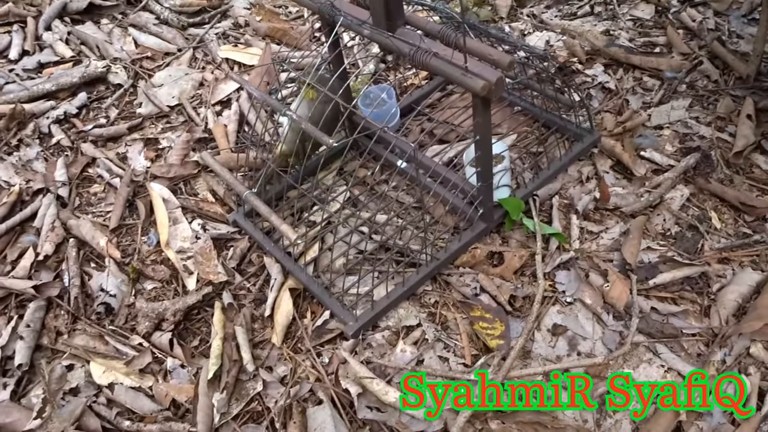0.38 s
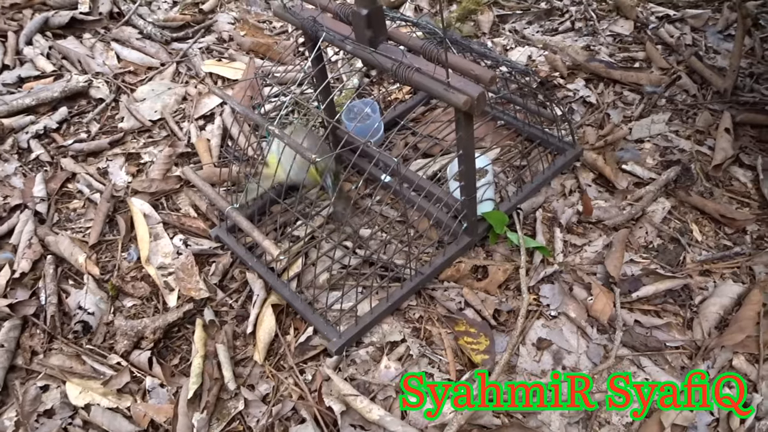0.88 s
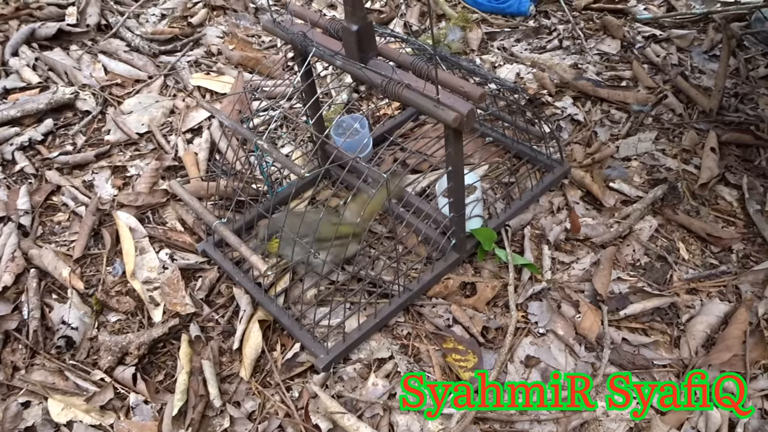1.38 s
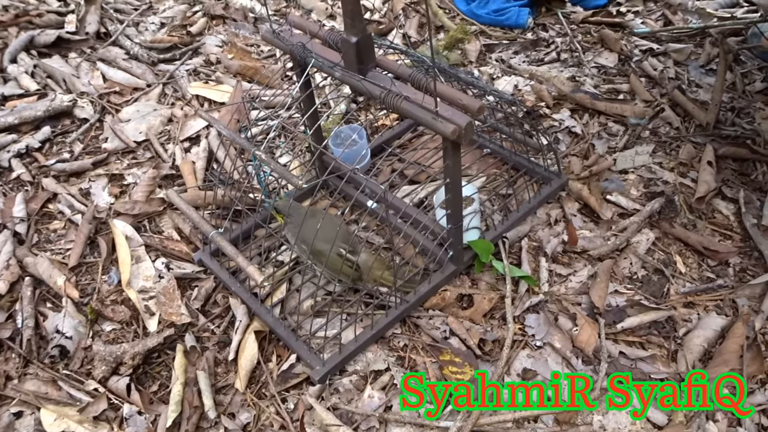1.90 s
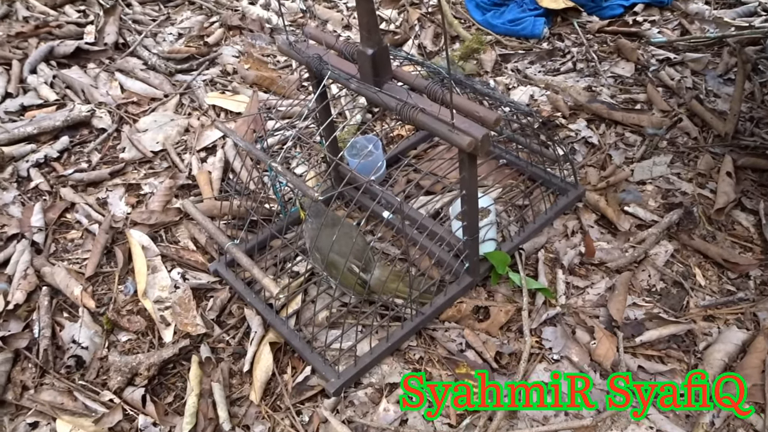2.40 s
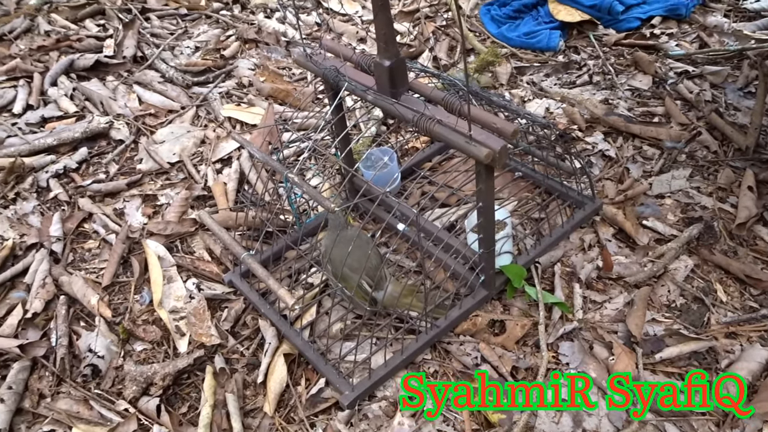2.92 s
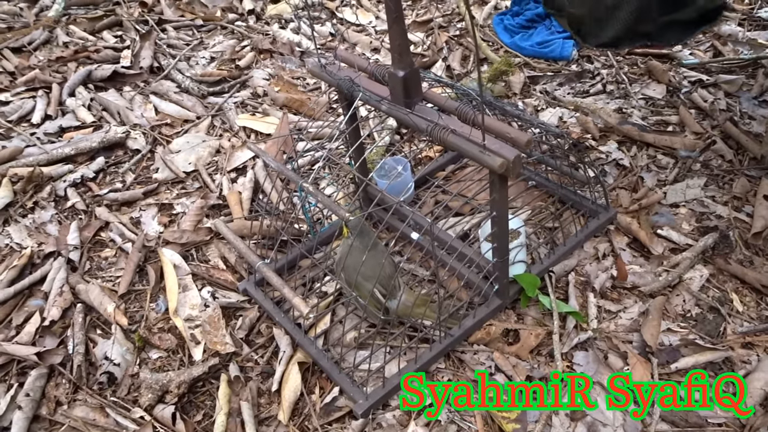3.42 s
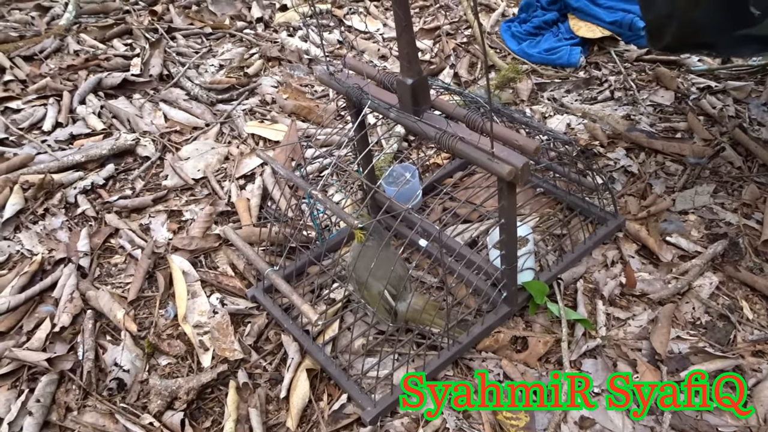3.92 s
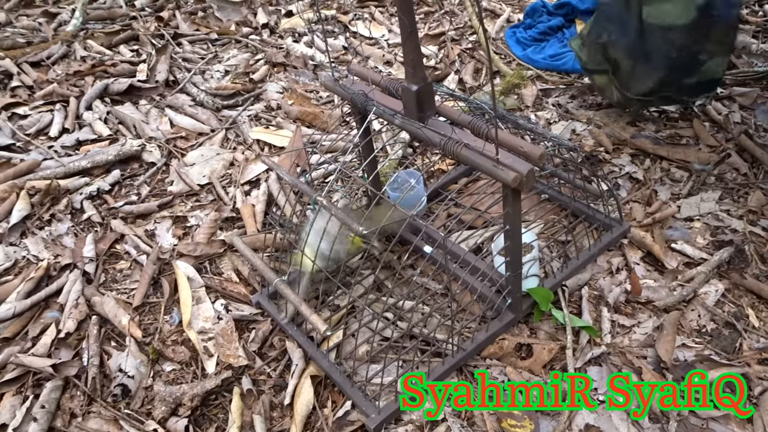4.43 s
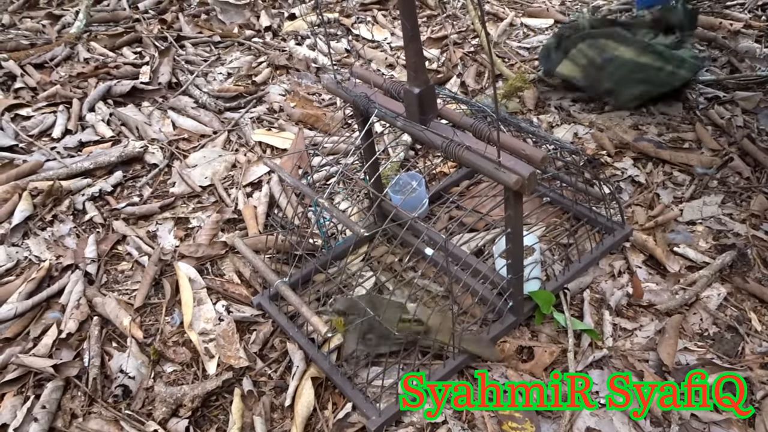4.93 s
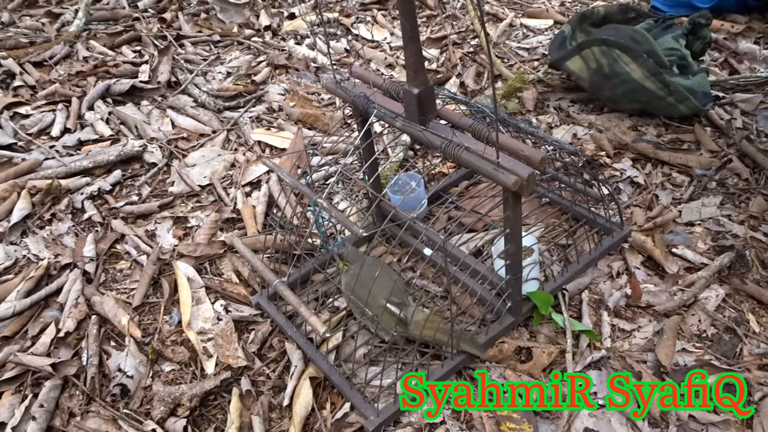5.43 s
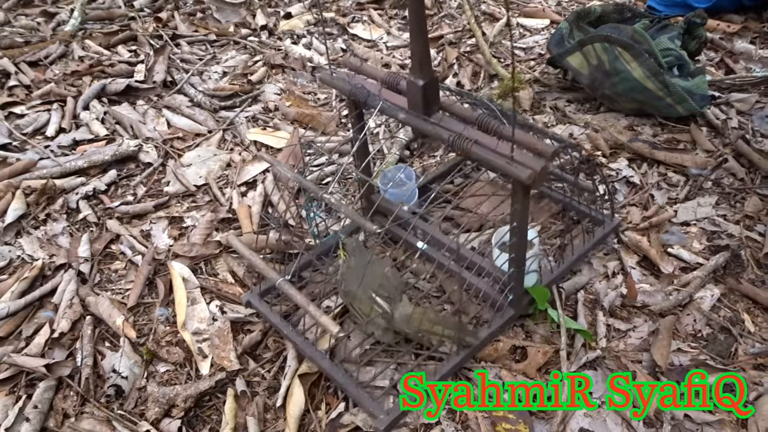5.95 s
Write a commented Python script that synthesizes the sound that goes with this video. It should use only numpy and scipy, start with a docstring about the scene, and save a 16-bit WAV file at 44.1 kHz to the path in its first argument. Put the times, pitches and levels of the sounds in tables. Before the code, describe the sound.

Harsh rattling bird chatter bursts close on the left, a farther bird whistles and chatters, while a caged bird flutters and ticks against wires outdoors.

```python
"""A forest floor: low rumble, airy hiss and an insect chorus, all shaped noise, lie under thin tones for crickets.
A caged bird flutters: grainy noise for its wings, ringing clicks for the wires, short thuds for the frame.
A farther bird answers with chatter, and whistles and buzzes in gliding tones; a near bird on the left rattles
harsh chatter: pulses whose rate sweeps upward, coloured by the throat. Echoes surround both birds."""
import sys
import numpy as np
from scipy import signal
from scipy.fft import rfft, irfft, next_fast_len
from scipy.io import wavfile
from scipy.ndimage import uniform_filter1d, map_coordinates

SR = 44100
rng = np.random.default_rng(int(sys.argv[2]) if len(sys.argv) > 2 else 0)


def volts(x):
    """Linear amplitude factor 10**(x/20) for a level x in dB, scalar or array-like."""
    e = np.asarray(x, float) / 20
    return 10 ** e


def generate_wav(signal):
    """Clip the signal to [-1, 1] and save it as 16-bit WAV at the path in sys.argv[1]."""
    frames = np.transpose(np.atleast_2d(signal))
    scaled = np.clip(frames, -1, 1) * 32767
    pcm = np.round(scaled).astype(np.int16)
    wavfile.write(sys.argv[1], SR, pcm)


N = 267687
TOP_HZ = 11050  # chatter has no overtones above this, and the whole mix is dimmed there


def unit(x):
    """Scales a sound to rms 1."""
    return x / np.sqrt(np.mean(x ** 2) + 1e-20)


def along(points, hz):
    """Reads a value between (frequency [Hz], value) points on a log frequency axis."""
    f, v = np.transpose(points)
    return np.interp(np.log(hz + 1), np.log(f + 1), v)


def curves(rows):
    """Draws lines between timed rows: one value per sample for each column after the time."""
    s, *columns = np.transpose(rows)
    return [np.interp(np.arange(N) / SR, s, column) for column in columns]


def wobble(rate, size=N):
    """A smooth random curve with rate random knots a second."""
    knots = rng.standard_normal(int(size * rate / SR) + 4)
    return map_coordinates(knots, [np.arange(size) * rate / SR])


def filtered(x, response):
    """Multiplies the spectrum of x by a response of frequency."""
    m = next_fast_len(x.shape[-1] + 8192)
    spectrum = rfft(x, m) * response(np.fft.rfftfreq(m, 1 / SR))
    return irfft(spectrum, m)[..., :x.shape[-1]]


def resonances(modes):
    """Response of ringing (frequency [Hz], width [Hz], level [dB]) modes, added with alternating sign."""
    def response(f):
        return sum((-1) ** k * volts(db) * 1j * f * width / (hz * hz - f * f + 1j * f * width)
                   for k, (hz, width, db) in enumerate(modes))
    return response


def add(track, s, sound):
    """Mixes a sound into a track from time s."""
    part = track[..., round(s * SR):][..., :sound.shape[-1]]
    part += sound[..., :part.shape[-1]]


# How alike left and right are in the noises: (frequency [Hz], likeness [0 to 1])
LIKENESS = [(60, 0.97), (170, 1), (490, 0.71), (1390, 0.52), (3960, 0.2), (11300, 1)]


def rush(gain, patchy_db):
    """Stereo noise of rms 1: a gain over frequency colours it and random patches swell and fade."""
    z = signal.stft(rng.standard_normal((2, N)), nperseg=512)[2]
    patches = uniform_filter1d(uniform_filter1d(rng.standard_normal(z.shape[1:]), 6, 0), 10, 1)
    pair = signal.istft(z * volts(patchy_db * unit(patches)), nperseg=512)[1][:, :N]

    def middle_and_side(hz):
        turn = np.arccos(np.clip(along(LIKENESS, hz), -1, 1)) / 2
        return gain(hz) * [np.cos(turn), np.sin(turn)]

    mid, side = filtered(pair, middle_and_side)
    return unit(np.array([mid + side, mid - side]))


# How fast echoes of each pitch die, before life stretches it: (frequency [Hz], time to fall 60 dB [s])
ECHO_TIMES = [(1000, 0.19), (4000, 0.23), (10000, 0.36)]


def echoes(x, life):
    """Trunks scatter the sound back: a decaying noise tail, each frequency dying at its own speed."""
    hz, t, z = signal.stft(rng.standard_normal((2, SR // 2)), SR, nperseg=256)
    decay = volts(-60 * t / (life * along(ECHO_TIMES, hz)[:, None]))
    tail = signal.istft(z * decay, SR, nperseg=256)[1]
    late = np.pad(x, (200, 0))  # echoes start 200 samples after the sound
    return signal.fftconvolve(late[None], tail / np.linalg.norm(tail[0]), axes=1)[:, :N]


def placed(x, side, lag_s):
    """Places a sound in stereo: left and right differ in level, and the left hears it lag_s earlier."""
    def response(f):
        level = volts(np.outer([.5, -.5], along(side, f)))
        return level * np.exp(np.outer([1j, -1j], np.pi * f * lag_s))
    return filtered(x, response)


# Strength of the rumble over time: (time [s], level [dB])
RUMBLE_LEVEL = [(0.0, -54.5), (0.98, -61.5), (1.55, -57.5), (1.76, -55.5), (2.64, -62.5), (3.11, -62),
                (4.06, -62), (4.38, -57.5), (4.62, -55), (4.95, -64), (5.29, -63), (6.07, -69.5)]
# Colour of the rumble: (frequency [Hz], relative level [dB per Hz])
RUMBLE_COLOUR = [(12, -60), (20, -9.5), (65, -1.5), (108, 1), (203, -1.5), (308, -10.5), (500, -27),
                 (650, -26), (1100, -120)]


def rumble():
    """Low rumble: deep noise whose strength wavers slowly."""
    level = volts(curves(RUMBLE_LEVEL)[0] + 1.5 * wobble(9))
    return level * rush(lambda f: volts(along(RUMBLE_COLOUR, f)), patchy_db=2.5)


# Strength of the two hisses: (time [s], insect level [dB], air level before a fixed boost [dB])
HISS_LEVELS = [(0.0, -50.5, -63.5), (0.93, -52.5, -61), (1.5, -51.5, -63), (1.72, -48.5, -68),
               (2.11, -50, -64), (3.25, -56, -66), (4.02, -56.5, -57.5), (4.36, -49.5, -59),
               (5.6, -54, -57.5), (6.07, -44.5, -61)]
# Colour of the air: (frequency [Hz], relative level [dB per Hz])
AIR_COLOUR = [(200, -9), (400, -6), (1100, -5), (2500, -7.5), (4000, -11), (5600, -12.5), (8500, -15),
              (11200, -21)]


def air():
    """Broad airy noise, softer toward the treble."""
    level = volts(curves(HISS_LEVELS)[1] + 4.0)
    return level * rush(lambda f: volts(along(AIR_COLOUR, f)), patchy_db=3.0)


# Bands of the far insect chorus: (centre [Hz], width [Hz], relative level [dB])
INSECT_BANDS = [(3120, 157, 4), (4780, 186, -10), (6380, 28, 0), (7330, 540, -6), (9160, 265, -12.5)]


def insects():
    """Far insect chorus: noise gathered into bands, too dense to hear single insects."""
    def bands(f):
        return np.sqrt(sum(volts(2 * db) * np.exp(-((f - hz) / width) ** 2) for hz, width, db in INSECT_BANDS))
    level = volts(curves(HISS_LEVELS)[0] + .5 * wobble(6))
    return level * rush(bands, patchy_db=.5)


def tones(rows, blur_hz, waver_db):
    """Long faint sine tones that swell in, drift in pitch, waver and fade."""
    track = np.zeros((2, N))
    for start, end, first_hz, last_hz, db in rows:
        size = int((end - start) * SR)
        u = np.arange(size) / size
        hz = first_hz + (last_hz - first_hz) * u + blur_hz * wobble(28.74, size=size)
        fade = np.clip(6 * np.minimum(u, 1 - u), 0, 1)
        level = volts(db + waver_db * wobble(11.6, size=size)) * fade
        phase = 2 * np.pi * np.cumsum(hz) / SR + rng.normal(0, 0.66, (2, 1))  # left and right differ
        add(track, start, np.sqrt(2) * level * np.sin(phase))
    return track


# Faint low tones: (start [s], end [s], first pitch [Hz], last pitch [Hz], level [dB])
HUM_TONES = [(3.66, 4.2, 704, 705, -61), (4.62, 5.0, 705, 706, -59), (4.66, 5.0, 1410, 1412, -59),
             (5.0, 5.5, 1412, 1414, -64)]


def hum():
    """Faint low tones with a nearly steady pitch."""
    return tones(HUM_TONES, blur_hz=4.4, waver_db=2.5)


# Cricket trills, most of them rising: (start [s], end [s], first pitch [Hz], last pitch [Hz], level [dB])
CRICKET_TRILLS = [(0, .6, 3070, 3085, -57), (.4, 1.4, 3225, 3225, -59), (.6, 1.5, 2990, 3010, -59),
                  (2.2, 3.65, 2980, 3018, -56.5), (2.2, 3.35, 3072, 3110, -58), (2.9, 4.9, 3155, 3232, -59),
                  (4.6, 6.07, 3075, 3100, -58), (5.2, 6.07, 3000, 3015, -64), (0, 3, 9250, 9300, -72),
                  (3.5, 4.2, 9200, 9250, -74)]


def crickets():
    """Crickets as thin high tones that waver in strength and pitch."""
    return tones(CRICKET_TRILLS, blur_hz=4.9, waver_db=4.5)


# Bouts of rustling wings and litter: (start [s], end [s], level [dB])
RUSTLE_BOUTS = [(0.306, 0.313, -41.5), (0.421, 0.439, -45), (1.453, 1.485, -51.5), (1.493, 2.024, -51),
                (4.147, 4.145, -34.5), (4.2, 4.208, -39.5), (4.269, 4.283, -38), (4.31, 4.453, -45.5),
                (4.484, 4.5, -33), (4.562, 4.593, -46), (4.631, 4.634, -43), (4.68, 4.707, -46),
                (4.896, 4.95, -48.5), (4.99, 5.294, -46), (5.82, 5.835, -51), (6.009, 6.073, -46.5)]


def flutter():
    """Strength of the rustle: each bout rises, holds and dies away."""
    t = np.arange(N) / SR
    rise_db_per_s, fall_db_per_s = 491, 248
    level = np.zeros(N)
    for start, end, db in RUSTLE_BOUTS:
        before, after = np.maximum(start - t, 0), np.maximum(t - end, 0)
        level += volts(db - rise_db_per_s * before - fall_db_per_s * after)
    return level


# Colour of the rustling wings: (frequency [Hz], relative level [dB per Hz])
WING_COLOUR = [(59, -48), (100, -3), (226, -21.5), (700, -2.5), (837, -10), (1580, 2.5), (2000, -1.5),
               (3160, -2), (9620, -6), (11500, -5), (15000, -60), (22000, -120)]


def rustle(level):
    """Rustling wings: noise broken into grains by two fast random swells."""
    grains = volts(4.0 * wobble(60) + 2.25 * wobble(400))
    noise = rush(lambda f: volts(along(WING_COLOUR, f)), patchy_db=2.5)
    return level * unit(grains * noise)


# Ringing of the cage wires: (frequency [Hz], width [Hz], relative level [dB])
WIRE_RINGING = [(2000, 1300, -10.5), (3830, 660, 4), (6530, 850, 5), (9820, 2000, 0)]


def patter(level):
    """Small random ticks ring the wires, rising and falling with the rustle, their peaks above it."""
    hits_per_s, over_rustle_db, spread_db = 54, 11, 0.5
    hits = (rng.random(N) < hits_per_s / SR) * volts(spread_db * rng.standard_normal((2, N))) * level
    t = np.arange(SR // 100) / SR
    snap = filtered(rng.standard_normal(len(t)) * volts(-60 * t / 0.0099), resonances(WIRE_RINGING))
    return volts(over_rustle_db) * signal.fftconvolve(hits, snap[None] / abs(snap).max(), axes=1)[:, :N]


# Single short ticks, some very faint; peak and body get a small fixed boost:
# (time [s], peak level [dB], body level below 4500 Hz [dB], left over right [dB])
SHORT_TICKS = [(0.105, -37.5, -23, 11), (0.375, -30, -12, 3), (1.4337, -26, -16, -4), (1.4633, -27, -3, 6),
               (3.302, -43.5, 7, -13), (3.7133, -39.5, 11, -9), (3.892, -49, -18, -16),
               (4.14, -27.5, -13, -22), (4.4858, -22, 24, 9), (4.65, -30, 11, -2), (4.8365, -29, -10, 0),
               (4.927, -31, -8, -11), (4.8648, -13, -8, 5.5), (4.916, -23.5, -8, -2), (4.938, -23, -13, 5),
               (5.075, -28, 13, 19), (5.1068, -24.5, 9, 13), (5.255, -35, -10, -16), (5.284, -37, -13, -23),
               (5.378, -44, -17, -33), (5.848, -24, 11, 3), (6.0463, -9, -0.5, 6.5)]


def short_ticks():
    """Single short ticks: a very short burst of noise through the ringing of the wires."""
    track = np.zeros((2, N))
    t = np.arange(SR // 10) / SR
    for s, db, body_db, pan_db in SHORT_TICKS:
        burst = rng.standard_normal(len(t)) * volts(-60 * t / .006)
        snap = filtered(burst, lambda f: resonances(WIRE_RINGING)(f) * volts((body_db + 2.5) * (f < 4500)))
        sides = volts(np.array([[pan_db], [-pan_db]]) / 2)
        add(track, s - .0005, volts(db + 0.5) * snap / abs(snap).max() * sides)
    return track


# Bumps on the frame: (time [s], level before a fixed cut [dB], pitch of the thud [Hz])
FRAME_BUMPS = [(0.144, -46.5, 387), (4.119, -35.5, 150), (4.157, -33, 156), (4.261, -33.5, 171),
               (4.476, -34.5, 195), (4.519, -37.5, 259), (4.626, -38.5, 330), (4.687, -45, 330),
               (5.458, -26, 131)]


def frame_bumps():
    """The wooden frame bumps: a short low tone with a noisy knock, stronger in higher bumps."""
    track = np.zeros((2, N))
    t = np.arange(SR // 10) / SR
    for s, db, hz in FRAME_BUMPS:
        knock = unit(filtered(rng.standard_normal(len(t)), resonances([(330, 78, -8), (1220, 2100, -22)])))
        thud = np.sin(2 * np.pi * hz * t + 0.86 * wobble(143, size=len(t)))
        shape = volts(db - 3.5 - 60 * t / 0.12) * (1 - np.exp(-t / 0.0051))
        add(track, s, shape * ((hz / 300) ** 2 * knock + thud))
    return track


def cage():
    """The caged bird: wings rustle in grainy gusts, short ticks ring, the frame bumps."""
    level = flutter()
    return patter(level) + rustle(level) + short_ticks() + frame_bumps()


def voice(rows, db, overtones_db, carry):
    """One gliding note (fundamental first in overtones_db): it swells in, carries by its pitch and fades."""
    soft_db, swell_s, fade_s = 6.5, 0.0079, .0018  # starts soft_db softer
    s, hz = np.transpose(rows)
    t = np.arange(s[0], s[-1], 1 / SR)
    pitch = uniform_filter1d(np.interp(t, s, hz), 90)
    phase = 2 * np.pi * np.cumsum(pitch * (1 + 0.017 * wobble(248.8, size=len(t)))) / SR
    fade = np.clip(np.minimum(t - s[0], s[-1] - t) / fade_s, 0, 1)
    tone = sum(volts(o) * np.sin((k + 1) * phase) for k, o in enumerate(overtones_db))
    swell_db = -soft_db * np.exp(-(t - s[0]) / swell_s)
    level_db = db + along(carry, pitch) + swell_db + 1.73 * wobble(187, size=len(t))
    return np.sqrt(2) * volts(level_db) * fade * tone


# Whistled notes, one list of points for each: (time [s], pitch [Hz])
WHISTLES = [
    [(0.467, 1710), (0.475, 3380), (0.482, 3800), (0.495, 4420)],
    [(0.6, 2000), (0.614, 2185), (0.622, 3190), (0.629, 4050), (0.64, 3870)],
    [(1.805, 1565), (1.815, 2220), (1.827, 4030), (1.839, 3794)],
    [(1.93, 2160), (1.945, 2060), (1.96, 3200)],
    [(2.102, 1620), (2.112, 2170), (2.127, 3880), (2.144, 3790), (2.157, 3770)],
    [(2.158, 3500), (2.166, 2584), (2.182, 3790), (2.2, 3710), (2.222, 2740)],
    [(2.297, 2100), (2.305, 3120)],
    [(2.305, 4110), (2.315, 4170), (2.331, 3130), (2.345, 2990)],
    [(2.396, 1910), (2.405, 3150), (2.42, 2810), (2.438, 2830), (2.456, 3550), (2.472, 3360)],
    [(2.607, 2080), (2.619, 2070), (2.624, 2440), (2.632, 2620)],
    [(2.7, 2180), (2.722, 1947), (2.742, 2130), (2.752, 1950)],
    [(2.822, 2580), (2.842, 2640), (2.854, 4220), (2.876, 4380)],
    [(3.008, 2093), (3.024, 2090), (3.03, 2760), (3.042, 3095), (3.06, 3190), (3.068, 2440), (3.084, 2370),
     (3.098, 2680)],
    [(5.153, 2940), (5.165, 2900)],
    [(5.221, 2780), (5.234, 2740)],
    [(5.292, 2840), (5.3, 2630), (5.322, 2480)],
    [(5.595, 3500), (5.629, 4020)],
    [(5.705, 1950), (5.713, 2890), (5.722, 3800), (5.737, 3904), (5.745, 4150)],
    [(5.82, 1927), (5.834, 2470), (5.842, 3080)],
    [(5.843, 2300), (5.851, 3240)],
    [(5.853, 4470), (5.863, 3520), (5.875, 3600)],
    [(5.962, 1900), (5.98, 2060), (5.992, 3760), (6.012, 3730), (6.02, 4020)],
    [(6.022, 3290), (6.029, 2430), (6.038, 3020)],
    [(6.052, 3750), (6.068, 3510)],
]
# Level of each whistle before its pitch and swell change it: level [dB]
WHISTLE_LEVELS = [-25, -32, -26, -27, -30.5, -30, -28, -30, -28.5, -30.5, -32.5, -30, -34.5, -31, -27.5,
                  -30, -51, -28.5, -27.5, -32, -34, -32.5, -28, -29.5]
# A whistle is loudest near the throat resonances: (pitch [Hz], change in level [dB])
WHISTLE_CARRY = [(1600, -13), (2050, -9), (2500, -14), (2850, -3.5), (3150, 1), (3500, -4.5), (3850, -1),
                 (4300, -12)]
# Nasal notes, one list of points for each: (time [s], pitch [Hz])
NASAL_NOTES = [
    [(.418, 653), (.436, 877), (.448, 775), (.466, 774)],
    [(5.672, 696), (5.68, 894), (5.695, 854), (5.705, 870)],
]
# Level of each nasal note before its swell and overtones: level [dB]
NASAL_LEVELS = [-40, -38.5]


def singer():
    """Whistles are nearly pure; nasal notes are stacks of overtones."""
    track = np.zeros(N)
    for note, db in zip(WHISTLES, WHISTLE_LEVELS):
        add(track, note[0][0], voice(note, db, [0, -42, -24], WHISTLE_CARRY))
    for note, db in zip(NASAL_NOTES, NASAL_LEVELS):
        add(track, note[0][0], voice(note, db, [-60, -9.5, -9.5, 1.0, -22], carry=[(800, 0)]))
    return track


# Pulse rate as a chatter note tightens, before each bird's pitch scales it: (time [s], rate [Hz])
PULSE_RATE = [(0, 906), (.006, 1170), (.0115, 1885), (.0135, 2927), (.03, 2876)]


def chatter(notes, uppers_db, colour, split_hz, reach_s, pitch, jitter, breath):
    """Harsh notes: unsteady, breathy pulses sweep upward through a lower and an upper throat formant."""
    lead_s = .003  # added before and after each note
    track, loudest_db = np.zeros(N), max(note[2] for note in notes)
    for (s, length, db), upper_db in zip(notes, uppers_db):
        size = int((abs(length) + 2 * lead_s) * SR)
        u = np.arange(size) / size
        unsteady = 1 + rng.normal(0, 0.0312) + jitter * wobble(878, size=size)
        hz = pitch * np.interp(reach_s * u, *np.transpose(PULSE_RATE)) * unsteady
        phase = 2 * np.pi * np.cumsum(hz) / SR
        pulses = unit(sum(np.cos(k * phase + rng.uniform(0, 2 * np.pi)) * (k * hz < TOP_HZ)
                          for k in range(1, 12)))
        puffs = rng.standard_normal(size) * (1 + np.cos(phase))  # breath escapes once a cycle
        puffs *= volts(np.clip(.6 * (loudest_db - db), 0, 8))  # weak notes are breathier
        swell = np.sin(np.pi * u) ** 1.3 * volts(1.3 * wobble(350, size=size))
        shape = 1 + rng.normal(0, 0.04)  # the throat is never held quite the same
        lower, upper = filtered(pulses + breath * puffs,
                                lambda f: volts(along(colour, shape * f)) * [f < split_hz, f >= split_hz])
        beak = volts(upper_db) * (0.55 + 2.16 * u ** 2)  # the beak opens as the note goes on
        sound = unit((unit(lower) + beak * unit(upper)) * swell)
        add(track, s - lead_s, volts(db - 1.0) * sound)
    return track


# Far chatter notes: (start [s], length before the added ends [s], level before a fixed cut [dB])
FAR_NOTES = [(0.1925, 0.0071, -36.5), (0.2387, 0.0087, -31.5), (0.2942, 0.0085, -32.5),
             (0.3074, 0.0098, -32.5), (0.3738, 0.0094, -43.5), (1.0743, 0.0076, -38.5),
             (1.1183, 0.021, -39), (1.1737, 0.011, -41.5), (1.2379, 0.0053, -40), (1.2984, 0.0086, -37.5),
             (1.3457, 0.013, -35), (1.4037, 0.014, -35.5), (1.4255, 0.01, -42), (1.4742, 0.015, -32),
             (1.489, 0.013, -42), (3.8569, 0.0083, -49), (3.9017, 0.016, -49), (3.9507, 0.028, -46.5),
             (4.0053, 0.0093, -38.5), (4.068, 0.014, -38.5), (4.1294, 0.0207, -40.5), (4.1901, 0.0196, -36),
             (4.2566, 0.026, -36.5), (4.62, 0.012, -62), (4.678, 0.011, -49.5), (4.9727, 0.0067, -31.5),
             (5.0206, 0.016, -33.5), (5.0815, 0.012, -31.5), (5.1401, 0.015, -32), (5.2098, 0.01, -33),
             (5.2887, 0.014, -44)]
# Upper formant of the far notes, before the beak opens: (time [s], level [dB])
FAR_UPPER = [(0.2, -17), (1.2, -17), (1.42, -2.5), (1.48, -39), (4.0, -7), (4.7, -4), (5.05, -15),
             (5.15, -27)]
# Throat colour of the far chatter: (frequency [Hz], relative level [dB])
FAR_COLOUR = [(1000, -67), (1500, -11.5), (2300, -31), (2800, 10.5), (3500, 11), (4100, 4.5), (4700, 8.5),
              (5500, -16), (7000, -18.5)]
# Left against right for the far bird: (frequency [Hz], left over right [dB])
FAR_BALANCE = [(500, -3), (2000, 11), (2800, 14), (4800, 3), (6000, 6)]


def far_bird():
    """The farther bird chatters, whistles and buzzes, deep in the echoes."""
    starts = np.transpose(FAR_NOTES)[0]
    uppers_db = np.interp(starts, *np.transpose(FAR_UPPER))
    call = chatter(FAR_NOTES, uppers_db, FAR_COLOUR, split_hz=4100, reach_s=.007,
                   pitch=.8, jitter=.03, breath=.35)
    call = call + singer()
    wet = volts(-2.5) * echoes(call, life=0.23) + volts(-3.0) * echoes(call, life=1.9)
    return placed(call, FAR_BALANCE, lag_s=.000055) + wet


# Near chatter notes: (start [s], length before the added ends [s], level before a fixed cut [dB])
NEAR_NOTES = [(0.8791, 0.025, -21.5), (0.9127, 0.015, -20), (0.9393, 0.02, -25.5), (0.9749, 0.023, -20),
              (1.002, 0.012, -29), (1.0379, 0.015, -24), (1.4987, 0.022, -20.5), (1.5305, 0.018, -21),
              (1.5951, 0.016, -18), (1.6613, 0.015, -19), (1.7206, 0.024, -20), (1.742, 0.0087, -34),
              (1.7766, 0.024, -19.5), (1.8363, 0.022, -19.5), (1.9016, 0.018, -18.5), (1.9675, 0.02, -20),
              (4.3098, 0.023, -20), (4.3447, 0.014, -17.5), (4.3891, 0.012, -18), (4.4434, 0.016, -18.5),
              (4.462, 0.0081, -31), (4.4957, 0.017, -19), (4.514, 0.0075, -29), (4.5461, 0.017, -18.5)]
# Throat colour of the near chatter: (frequency [Hz], relative level [dB])
NEAR_COLOUR = [(700, -38), (1000, -21), (2000, -15), (2900, -10), (3400, -7.5), (3900, 2.5), (4600, -8.5),
               (5300, -14.5), (6300, 0.5), (7000, -6.5), (7600, -22), (9500, -17), (11500, -18)]
# Left against right for the near bird: (frequency [Hz], left over right [dB])
NEAR_BALANCE = [(500, 8), (1400, 2), (3400, 8.5), (4800, 4.5), (9000, 2.5)]


def near_bird():
    """The near bird rattles on the left; the first note of a rattle has the beak nearly shut."""
    pause_s, open_db, shut_db = .2, -1.5, -15  # upper formant at the two beak settings
    gaps = np.diff([-1] + [note[0] for note in NEAR_NOTES])
    uppers_db = np.where(gaps > pause_s, shut_db, open_db)
    call = chatter(NEAR_NOTES, uppers_db, NEAR_COLOUR, split_hz=5300, reach_s=.021,
                   pitch=1, jitter=.06, breath=.47)
    wet = volts(-14.5) * echoes(call, life=0.9) + volts(-14.0) * echoes(call, life=0.19)
    return placed(call, NEAR_BALANCE, lag_s=.000018) + wet


def scene():
    """Adds all layers, from the background to the near bird."""
    background = rumble() + air() + insects() + hum() + crickets()
    return background + cage() + far_bird() + near_bird()


def roll_off(x):
    """The treble ends steeply here."""
    return signal.sosfilt(signal.butter(12, 11880, fs=SR, output="sos"), x)


def record(dry):
    """Dims everything from TOP_HZ upward by 30.5 dB and finishes the mix."""
    mix = filtered(dry, lambda hz: np.where(hz < TOP_HZ, 1, volts(-30.5)))
    return roll_off(mix)


dry = scene()
out = record(dry)
generate_wav(out)
```